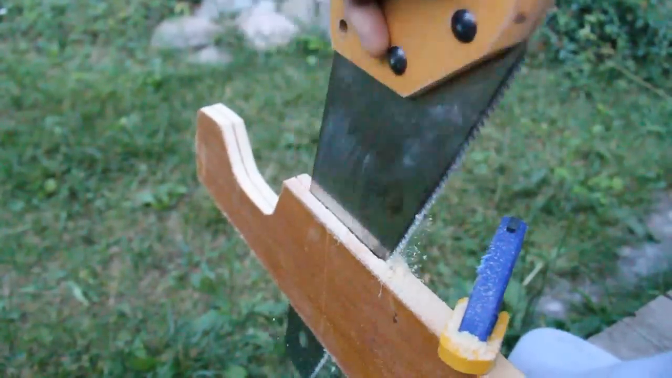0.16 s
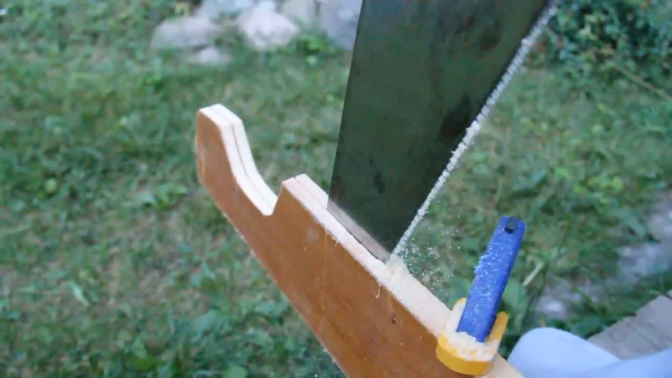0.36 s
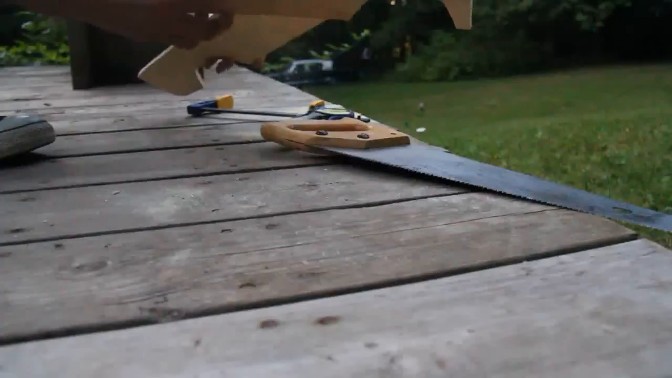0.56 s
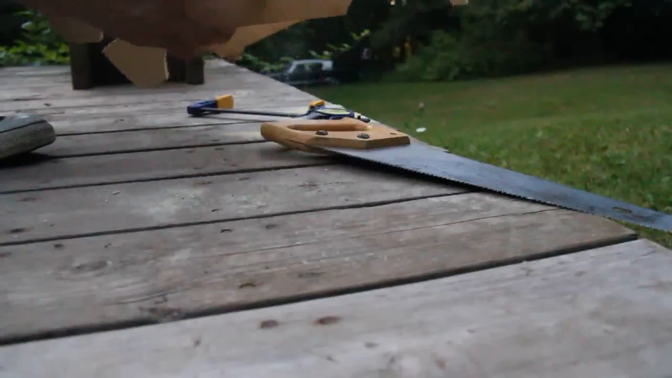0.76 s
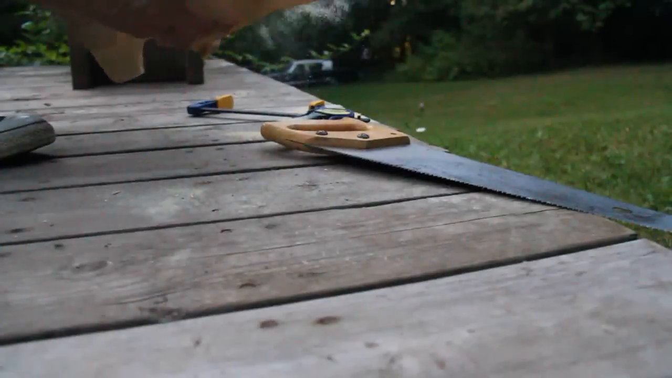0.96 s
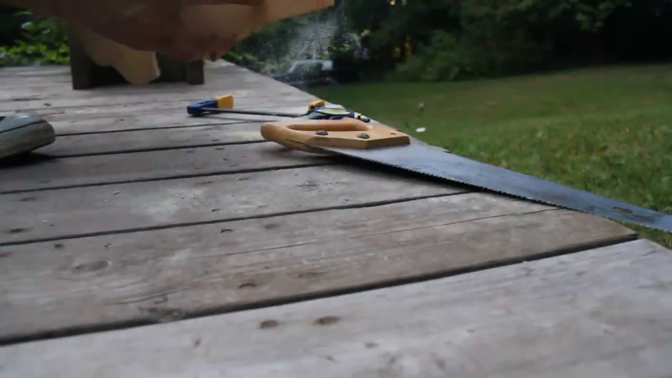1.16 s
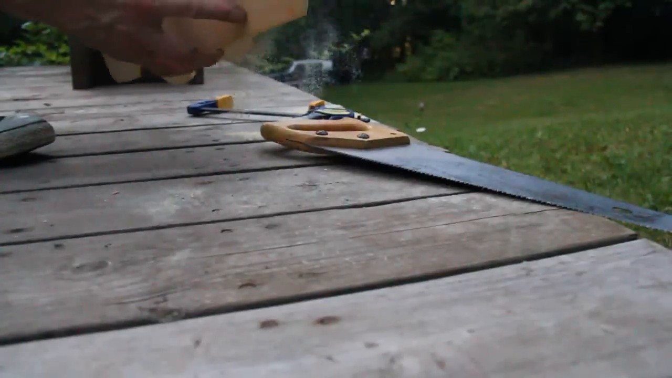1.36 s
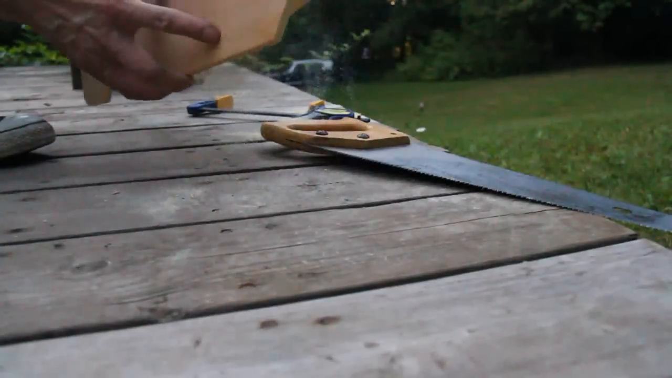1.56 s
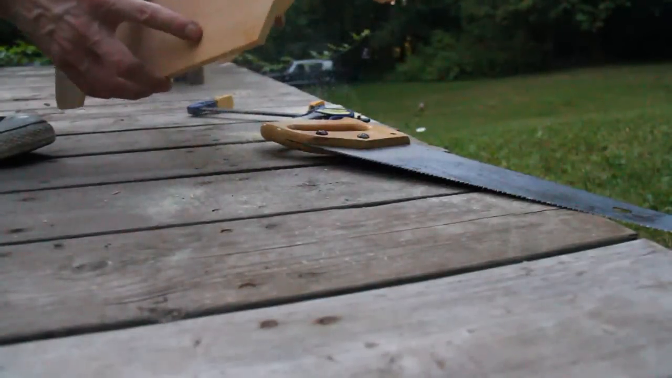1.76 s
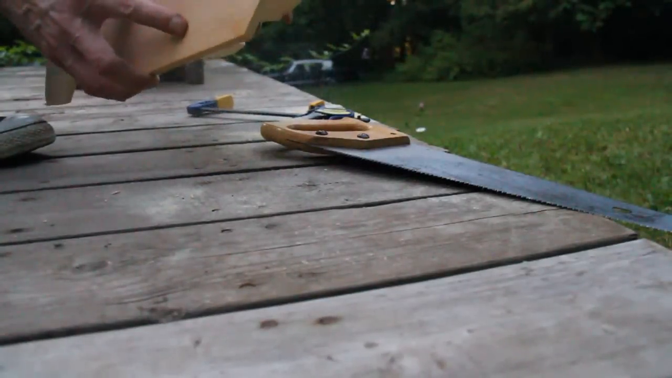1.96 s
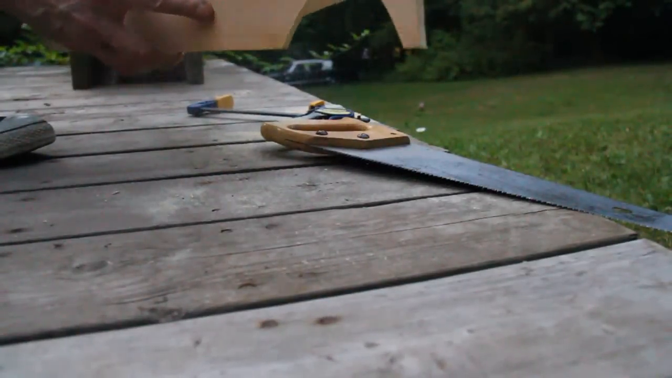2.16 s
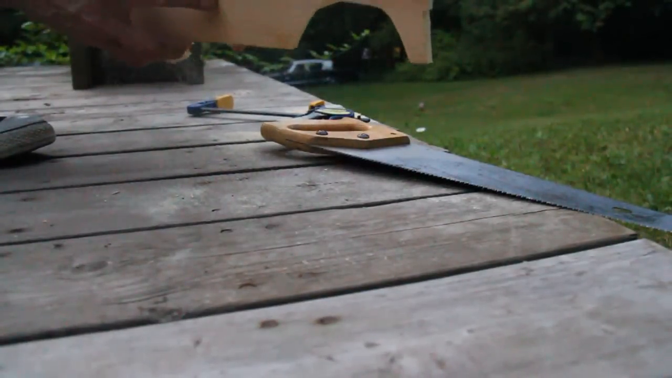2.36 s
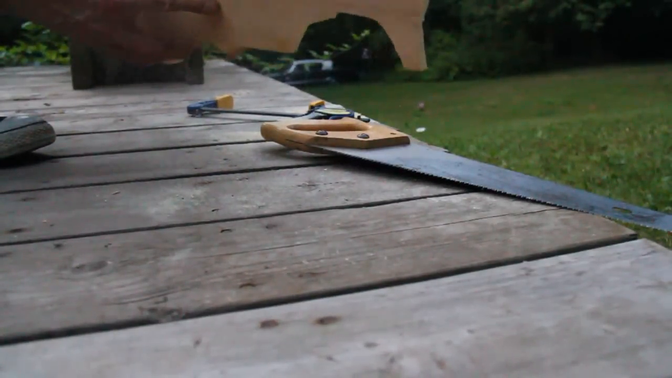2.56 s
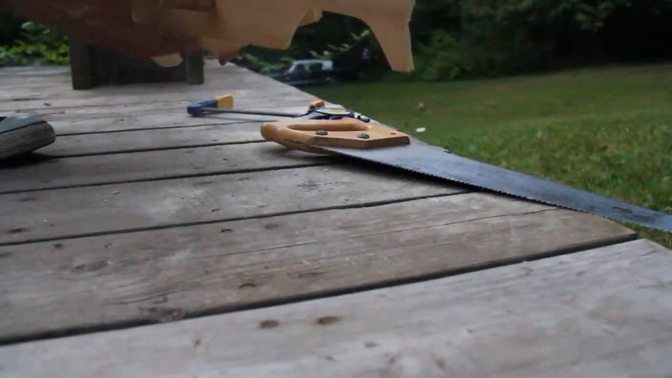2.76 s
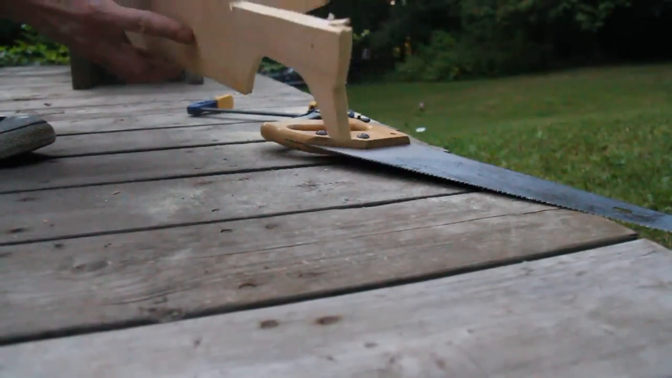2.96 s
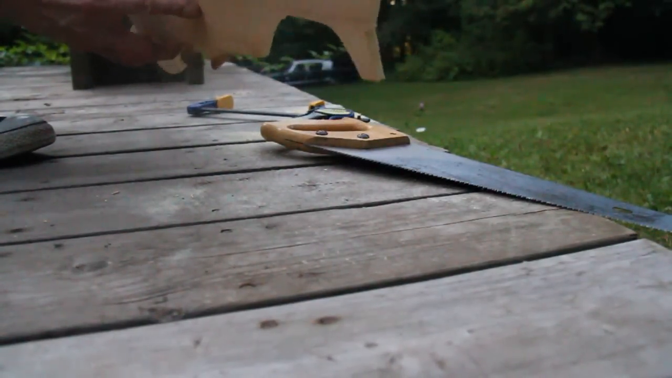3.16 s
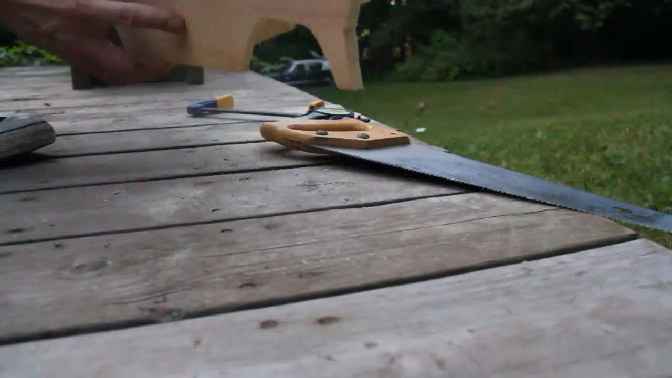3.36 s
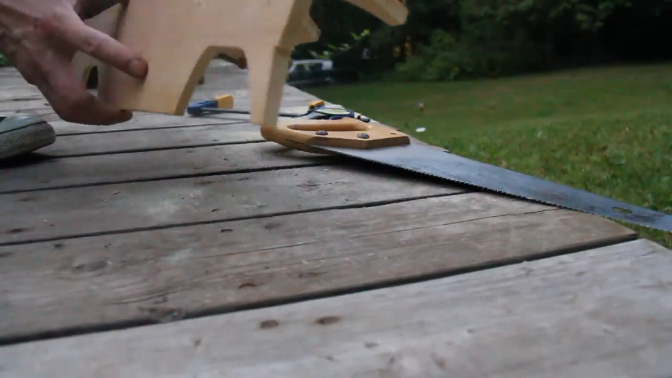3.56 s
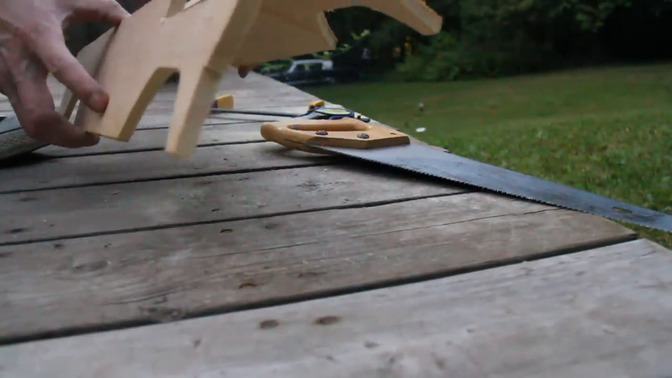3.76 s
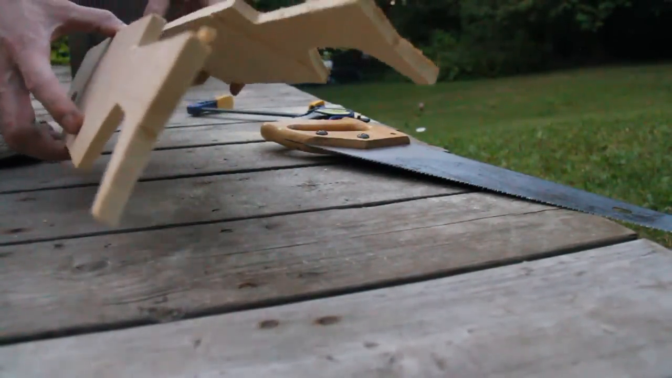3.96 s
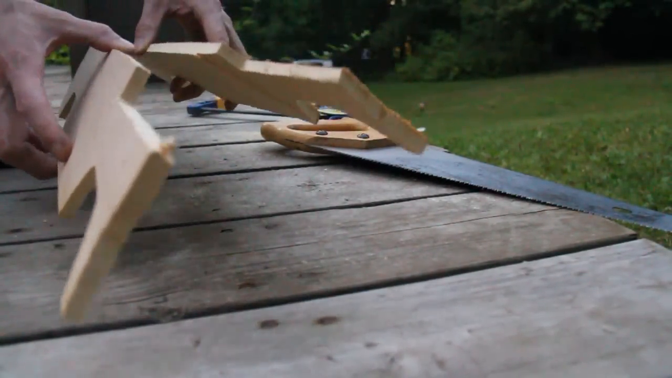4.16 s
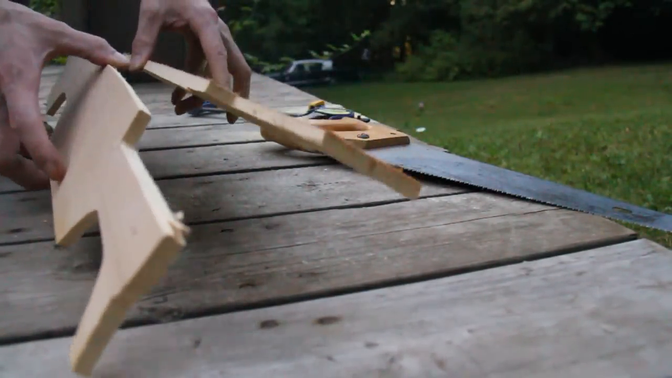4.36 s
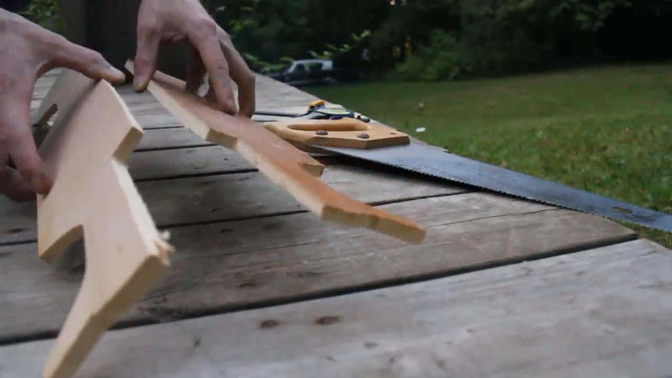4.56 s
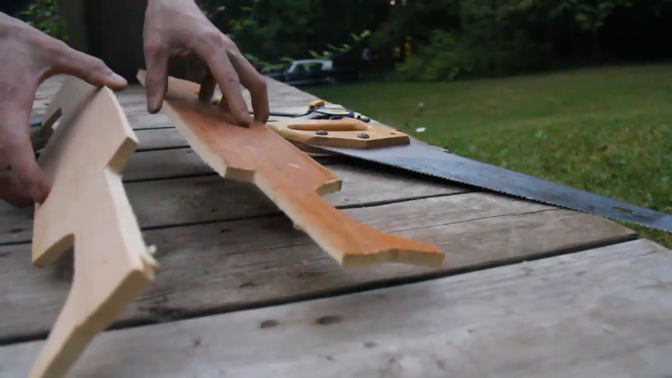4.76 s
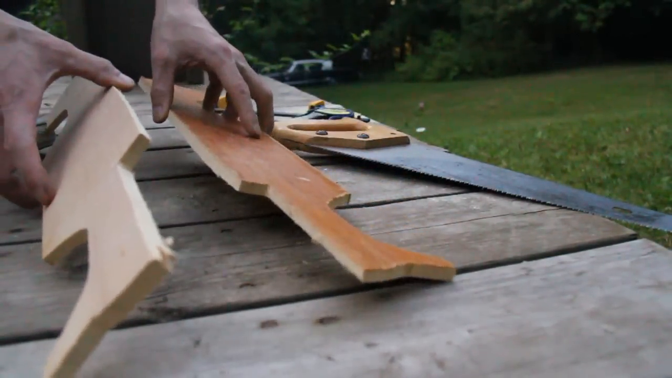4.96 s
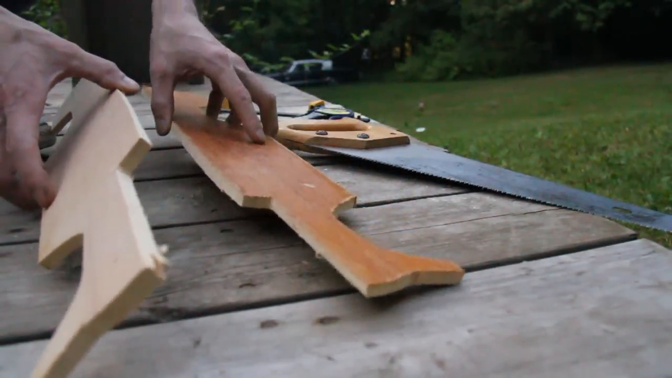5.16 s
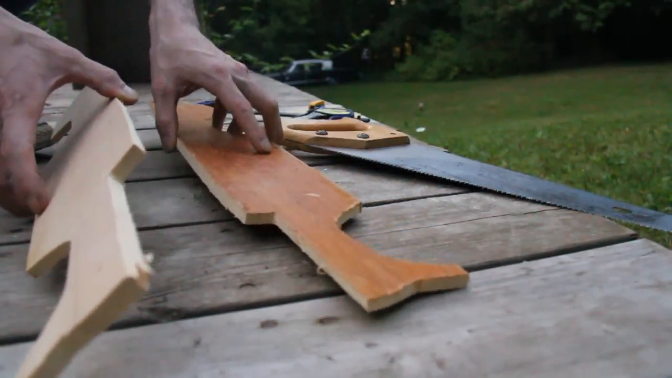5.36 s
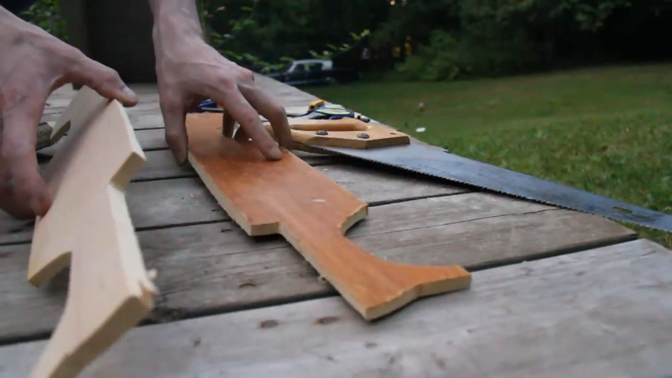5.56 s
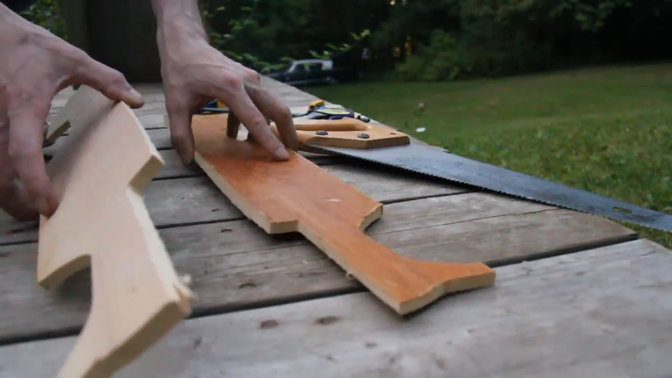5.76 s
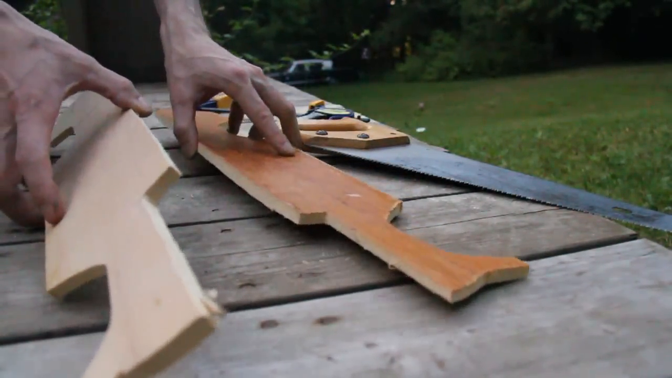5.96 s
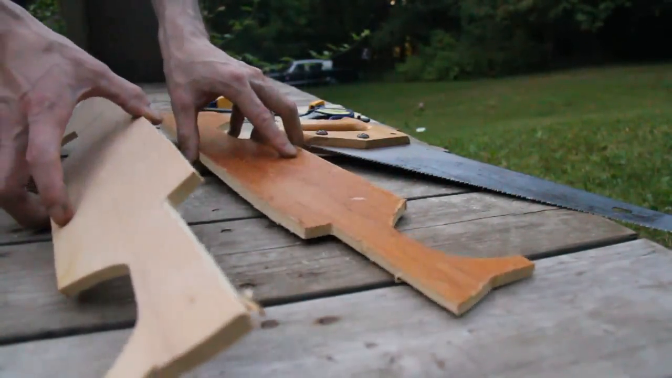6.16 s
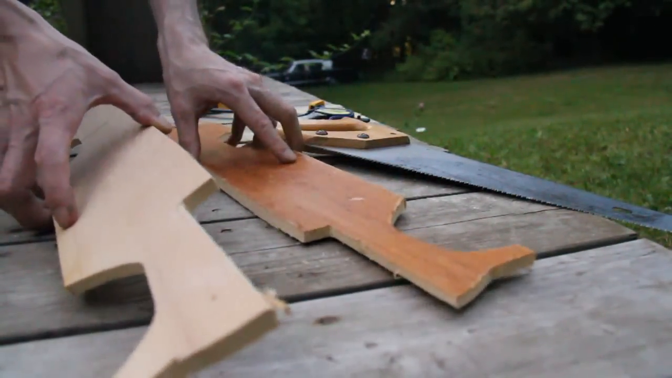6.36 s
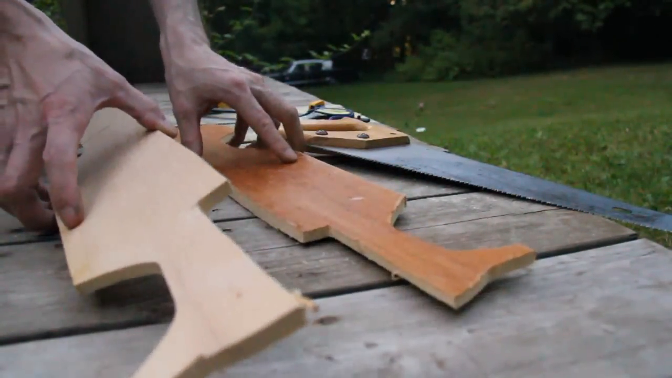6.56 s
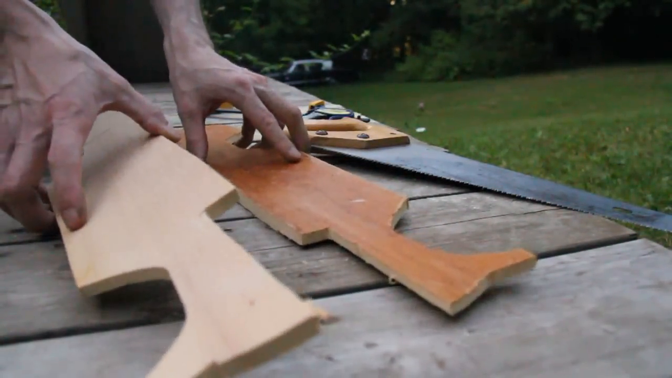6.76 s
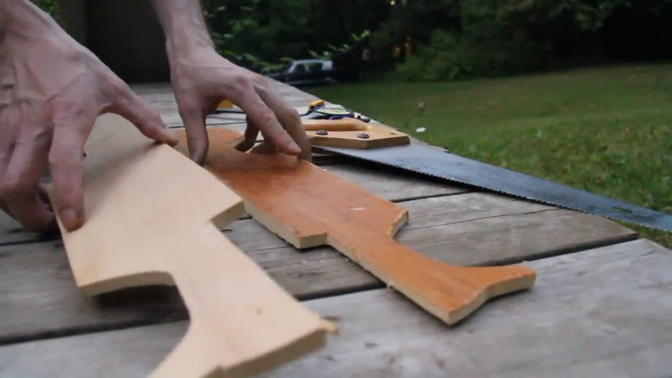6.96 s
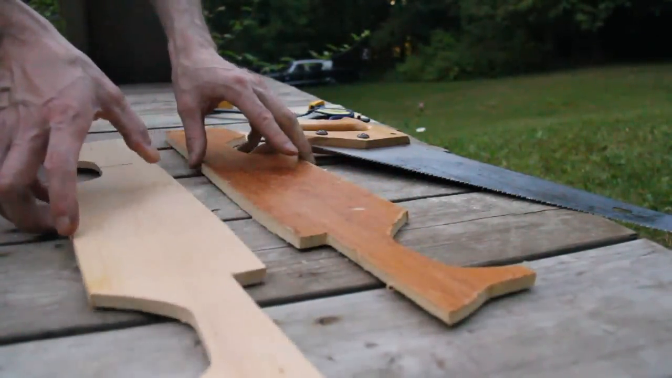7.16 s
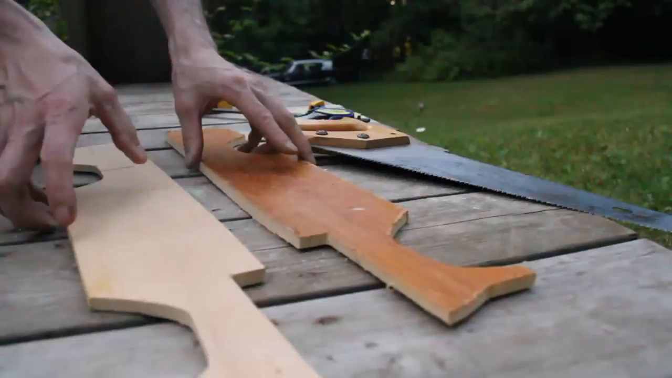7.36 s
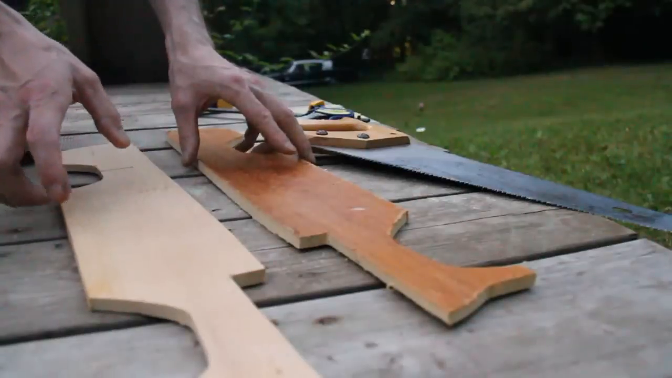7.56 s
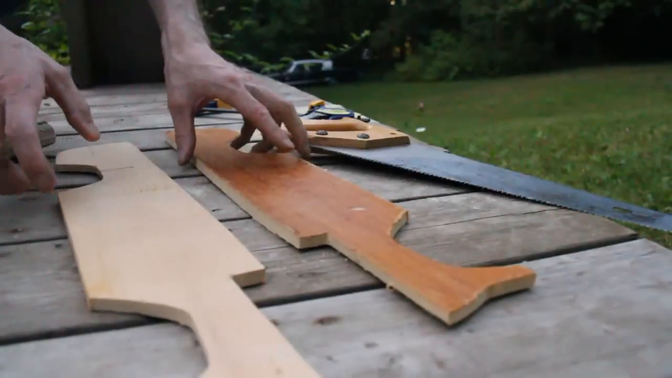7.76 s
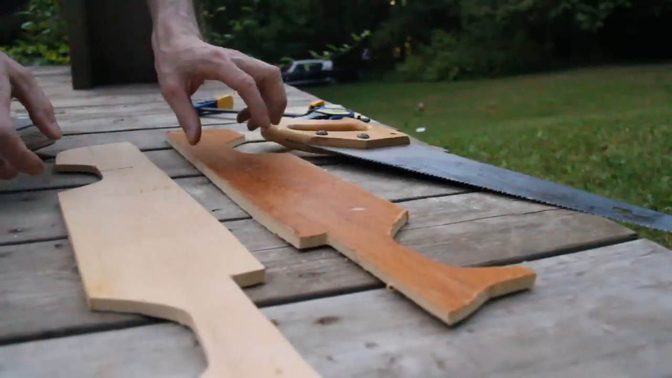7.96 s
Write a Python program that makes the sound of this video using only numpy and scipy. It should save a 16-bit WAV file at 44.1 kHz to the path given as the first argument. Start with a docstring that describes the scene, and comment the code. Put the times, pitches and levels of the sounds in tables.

```python
"""In a quiet garden, a handsaw takes its last strokes through a clamped board.
Then two cut boards are clapped together, rubbed by hands, slid over a wooden deck and laid down with knocks.
The saw is dense random bites, coloured and swelling with blade speed, plus a humming blade.
Rubs keep the ringing tones (modes) of the wood going with friction clicks; knocks set them off with short bursts.
The garden is coloured noise, and the yard sends back a dull wash of the knocks."""
import sys
import numpy as np
from scipy import signal
from scipy.fft import rfft, irfft, next_fast_len
from scipy.io import wavfile

SR = 44100
rng = np.random.default_rng(int(sys.argv[2]) if len(sys.argv) > 2 else 0)


def wav_record(signal):
    """Record a signal, one row per channel, as 16-bit PCM in the file named by sys.argv[1]."""
    frames = np.transpose(np.atleast_2d(signal))
    bounded = np.clip(frames, -1, 1)
    # unit amplitude maps onto the largest positive 16-bit level
    quanta = np.round(bounded * 32767).astype(np.int16)
    wavfile.write(sys.argv[1], SR, quanta)


N = 353241   # length in samples, about 8 s


def from_db(db):
    """Turn a level in dB into a gain."""
    return np.exp(np.asarray(db) * (np.log(10) / 20))


def rms_one(x):
    """Scale a signal to an rms (average strength) of 1."""
    return x / np.sqrt(np.mean(x ** 2) + 1e-20)


def in_time(rows):
    """Draw each level column as a gain over time, silent outside its first and last point."""
    s, *columns = np.transpose(rows)
    t = np.arange(N) / SR
    return [from_db(np.interp(t, s, column, left=-200, right=-200)) for column in columns]


def drift(rate_hz, size=N):
    """Wander slowly by chance with rms 1: smoothed noise drawn at every 20th sample."""
    step, settle = 20, 2000
    r = np.exp(-2 * np.pi * rate_hz * step / SR)
    noise = rng.standard_normal(size // step + settle + 2)
    slow = signal.lfilter([1], [1, -2 * r, r * r], noise)[settle:]   # skip the filter's start-up
    return np.interp(np.arange(size) / step, np.arange(len(slow)), rms_one(slow))


def grains(per_s, spread_db):
    """Scatter random clicks of uneven size and sign, like many tiny contacts."""
    size_db = spread_db * np.minimum(rng.exponential(1, N), 4)
    sizes = from_db(size_db) * rng.choice([-1, 1], N)
    return sizes * (rng.random(N) < per_s / SR)


def coloured(x, spectrum):
    """Shape the pitch balance of noise or clicks by a spectrum, then scale to rms 1."""
    hz, db = np.transpose(spectrum)
    size = next_fast_len(N)
    bins_hz = np.fft.rfftfreq(size, 1 / SR)
    gain = from_db(np.interp(np.log(bins_hz + 1), np.log(hz), db, left=-90, right=-90))
    return rms_one(irfft(rfft(x, size) * gain, size)[:N])


# background level, with brief dips: (t/s, level/dB)
GARDEN_LEVEL = [(0, -46), (1.1, -58), (1.6, -55.5), (2.7, -54), (2.8, -84), (3.2, -54.5), (3.3, -70),
                (3.9, -59), (4.6, -55), (7.2, -60.5), (7.6, -63.5), (8.01, -55)]
# colour of the background: (f/Hz, relative level/dB per Hz)
GARDEN_COLOUR = [(15, -37), (25, -3), (54, 1), (155, -14.5), (188, -13), (557, -18.5), (661, -9.5),
                 (934, -21.5), (2000, -22), (3800, -26), (9000, -42), (11700, -67), (19800, -120)]


def garden():
    """Quiet outdoor air: coloured noise whose level follows a curve."""
    level, = in_time(GARDEN_LEVEL)
    return level * coloured(rng.standard_normal(N), GARDEN_COLOUR)


YARD_T60_S, YARD_DB, YARD_HZ = 0.28, -32.5, 1050   # time to die by 60 dB, level, pitch region


def yard(x):
    """Walls and trees scatter a dull, dying wash back: the sound is smeared by fading noise."""
    t = np.arange(SR) / SR
    fade_in = np.minimum(t / 0.005, 1)
    tail = rng.standard_normal(SR) * from_db(-60 * t / YARD_T60_S) * fade_in
    dull = signal.butter(3, [.5 * YARD_HZ, 1.3 * YARD_HZ], "band", fs=SR, output="sos")
    tail = signal.sosfilt(dull, tail)
    return from_db(YARD_DB) * signal.fftconvolve(x, tail / np.sqrt(np.sum(tail ** 2)))[:N]


# bending tone of the blade, two runs: (t/s, f/Hz, level/dB before a 3 dB lift)
BLADE_FLEX = [
    [(0.17, 74, -43), (0.188, 71.3, -31), (0.238, 79.5, -20), (0.306, 89.2, -30), (0.382, 109, -30),
     (0.422, 114.4, -29), (0.56, 110.1, -40)],
    [(0.67, 126.5, -63), (0.676, 126, -48), (0.706, 128.3, -19.5), (0.736, 125.7, -48.5),
     (0.84, 131.5, -34), (0.93, 126.8, -39)],
]


def blade():
    """The flexing blade hums with a tone that follows its free length; returns the hum and its swing."""
    s, hz, db = np.vstack(BLADE_FLEX).T
    t = np.arange(N) / SR
    pitch_hz = np.interp(t, s, hz)
    swing = np.sin(2 * np.pi * np.cumsum(pitch_hz) / SR)
    level_db = np.interp(t, [0, *s, s[-1] + 0.074], [-45, *db, -90])
    return from_db(level_db + 3) * swing, swing


# saw strokes: (start t/s, length t/s, then before speed and flicker: shudder level/dB, rasp level/dB,
#               tearing level/dB; rasp change over the stroke level/dB, tearing change level/dB)
STROKES = [(-.35, 0.45, -17, -17.5, -21, 1.5, -8.5), (0.11, 0.54, -27, -17.5, -22.5, -7.5, -13.5),
           (0.61, 0.41, -31, -25, -23, -20.5, 2)]
# how steeply shudder, rasp and tearing follow blade speed: (power of the speed)
SPEED_POWER = [0.83, 2.1, 1.785]
SHUDDER_LEAN_DB = -19     # change of the shudder along a stroke
SHUDDER_REST_DB = -40     # steady shudder that lingers at the turns, before flicker and a 3 dB cut
CUT_THROUGH_S = 1.04      # the steady shudder stops here


def strokes():
    """Blade speed is a half sine per stroke; gains of shudder, rasp and tearing grow with it."""
    t, gains = np.arange(N) / SR, np.zeros((3, N))
    gains[0] = from_db(SHUDDER_REST_DB) * (t < CUT_THROUGH_S)
    for s, length, shudder_db, rasp_db, tearing_db, rasp_lean_db, tearing_lean_db in STROKES:
        along = np.clip((t - s) / length, 0, 1)   # 0 at the start of the stroke, 1 at its end
        speed = np.abs(np.sin(np.pi * along))
        lean_db = np.outer([SHUDDER_LEAN_DB, rasp_lean_db, tearing_lean_db], along - .5)
        levels_db = np.c_[[shudder_db, rasp_db, tearing_db]]
        gains += from_db(lean_db + levels_db) * speed ** np.c_[SPEED_POWER]
    return gains


# colours of the low shudder, the middle rasp and the high tearing: (f/Hz, relative level/dB per Hz)
SHUDDER_COLOUR = [(15, -45.5), (25, -9.5), (113, 2.5), (156, -1.5), (204, 4.5), (254, -10.5), (360, -6),
                  (400, -16.5), (520, -36.5), (880, -120)]
RASP_COLOUR = [(150, -35.5), (250, -11), (297, -4), (328, -23.5), (366, -2), (404, -5), (521, -1.5),
               (685, -6), (937, -14), (1320, -11.5), (1490, -20.5), (1800, -21), (2340, -22), (3960, -120)]
TEARING_COLOUR = [(880, -5), (1500, -6.5), (1830, -0.5), (2110, -7), (2450, -4.5), (3180, -8),
                  (4180, -10.5), (4550, -11.5), (6040, -15.5), (8860, -25.5), (11000, -40.5),
                  (14300, -75.5), (22000, -120)]


def saw():
    """Teeth bite in a dense uneven stream; blade swing strengthens rasp and tearing, catching adds flicker."""
    shudder, rasp, tearing = strokes()
    hum, swing = blade()
    catch = drift(17)
    shudder_flicker = from_db(1.6 * drift(30) - 3)
    rasp_flicker = from_db(.7 * catch + 1.1 * swing)
    tearing_flicker = from_db(1.4 * catch + 0.5 * swing)
    out = hum + shudder * shudder_flicker * coloured(grains(900, 4.8), SHUDDER_COLOUR)
    out += rasp * rasp_flicker * coloured(grains(3000, 2.8), RASP_COLOUR)
    return out + tearing * tearing_flicker * coloured(grains(7000, 2.2), TEARING_COLOUR)


RUB_EDGE_DB = -24.5   # how far below its full level a rub starts and ends


def swell(t, rise_s, hold_s, fall_s, start_s):
    """Level of one rub in dB: rise, hold and fall, silent outside."""
    lengths = [0, max(rise_s, .003), max(hold_s, .001), max(fall_s, .003)]
    corners = start_s + np.cumsum(lengths)
    return np.interp(t, corners, [RUB_EDGE_DB, 0, 0, RUB_EDGE_DB], left=-200, right=-200)


# rubs, slides and the jostling of the boards after a knock: (start t/s, rise t/s, hold t/s, fall t/s,
#   then before flicker: low board modes level/dB, high board modes level/dB, skin and dust hiss level/dB)
RUBS = [(0.949, .02, 0.034, 0.084, -41, -44, -48.5), (1.058, 0.063, .3, 0.11, -53, -60, -60.5),
        (1.187, .13, 0.013, 0.16, -45, -50.5, -59), (1.452, 0.077, 0.38, 0.056, -62, -68.5, -66.5),
        (1.697, 0.042, 0.15, 0.072, -60, -62.5, -72), (1.975, 0.03, 0.041, 0.051, -38.5, -45, -46.5),
        (2.107, 0.067, .12, 0.031, -42, -47.5, -47.5), (2.283, .02, 0.043, .05, -49, -48, -47),
        (2.365, 0.041, 0.075, 0.091, -45, -51.5, -56.5), (2.496, 0.11, .09, .02, -52.5, -59, -66),
        (2.688, .02, 0.038, 0.078, -50.5, -49.5, -60.5), (2.785, 0.066, 0.35, 0.034, -54.5, -71, -88),
        (3.035, 0.096, 0.0046, 0.027, -47, -54, -60), (3.199, .02, 0.046, 0.063, -45.5, -47.5, -58.5),
        (3.28, 0.055, 0.28, .4, -56, -64, -83), (3.5, .2, .95, .05, -66, -69.5, -66),
        (4.662, 0.024, .06, .04, -54, -63, -70.5), (4.748, 0.017, 0.056, 0.17, -46, -56, -57.5),
        (4.972, 0.054, 0.25, 0.062, -52.5, -60.5, -64.5), (5.163, .11, 0.047, 0.16, -46, -54, -59.5),
        (5.32, .08, 0.094, 0.16, -46.5, -53, -53), (5.52, 0.069, 0.13, 0.034, -54.5, -55, -61.5),
        (5.669, 0.075, 0.093, 0.037, -45.5, -48.5, -55.5), (5.774, 0.074, 0.31, 0.077, -41.5, -44.5, -50),
        (6.177, 0.067, 0.59, 0.22, -51.5, -59.5, -61.5), (6.295, 0.091, 0.045, 0.2, -53.5, -55, -62.5),
        (6.815, 0.1, .1, .05, -43.5, -52, -56.5), (6.955, 0.12, 0.072, 0.044, -36, -43.5, -47),
        (7.14, 0.054, 0.079, 0.027, -44, -50, -51), (7.25, .02, 0.026, 0.1, -46.5, -48.5, -59),
        (7.365, .04, 0.067, 0.074, -51, -65, -77.5), (7.493, 0.055, 0.044, 0.18, -54, -74.5, -81.5),
        (7.66, 0.08, 0.12, .2, -59, -67, -68)]


def rubs():
    """Gains of low modes, high modes and hiss, summed over the rubs every millisecond."""
    t = np.arange(0, N / SR, .001)
    gains = np.zeros((3, len(t)))
    for s, rise, hold, fall, *levels_db in RUBS:
        gains += from_db(swell(t, rise, hold, fall, s) + np.c_[levels_db])
    return [np.interp(np.arange(N) / SR, t, gain) for gain in gains]


HIGH_MODES_HZ = 1950   # modes above this count as high


def rubbed(modes, span, length):
    """Friction grains keep the modes ringing; the grip moves, so modes take turns. Low and high apart."""
    friction = grains(3000, 1.9) + 1e-18
    out = np.zeros((2, len(friction[span])))
    for hz, db, t60 in modes:
        r, w = from_db(-60 / (length * t60 * SR)), 2 * np.pi * hz / SR
        push = np.roll(friction, round(hz))[span]   # shifted, so the modes are not pushed all at once
        ring = signal.lfilter([1, 0, -1], [1, -2 * r * np.cos(w), r * r], push)
        turn_db = 2.5 * drift(5.8, size=len(ring))
        out[int(hz > HIGH_MODES_HZ)] += from_db(db + turn_db) * rms_one(ring)
    return [rms_one(out[0]), rms_one(out[1])]


# ringing tones of a board, and broad ones of a board dragged with its edge on the deck:
# (f/Hz, relative level/dB, time to die by 60 dB before the players scale it t/s)
BOARD_MODES = [(622, -14.5, 0.29), (799.7, 2, 0.053), (885.6, 1, 0.05), (1052.5, 5.5, 0.049),
               (1199, 5, 0.041), (1351, 6.5, 0.038), (1478, -3.5, 0.099), (1684, 1, 0.04), (1863, 6, 0.03),
               (2166, -8, 0.057), (2375, -10.5, .045), (2674, -8.5, .04), (3012, -12, 0.063),
               (3280, -26, 0.09), (3943, -36, .03), (4860, -47, 0.041)]
DRAGGED_MODES = [(515, -4.5, 0.12), (735.3, 1.5, 0.051), (792.5, -3, 0.1), (1054.6, 3.5, 0.032),
                 (1187, -0.5, 0.16), (1336, 4, 0.023), (1538, 0, 0.04), (1765, -1.5, 0.026),
                 (2114, 5, 0.013), (2310, 0, 0.056), (2450, 2.5, 0.028), (2714, 0, 0.022),
                 (3340, -18.5, .04), (3930, -6, 0.043), (4500, -18, .05)]
# colour of the skin and dust hiss: (f/Hz, relative level/dB per Hz)
HISS_COLOUR = [(1880, -17.5), (3200, 4), (3890, 0), (4240, -1.5), (5640, -3.5), (8810, -22), (9300, -32),
               (11200, -60.5), (20500, -120)]
# level of the rumble in the deck, before flicker and dragging: (t/s, level/dB)
RUMBLE_LEVEL = [(1.04, -51), (1.41, -56.5), (2.09, -51.5), (2.5, -53), (2.63, -52.5), (2.8, -59),
                (3.54, -70), (3.99, -70.5), (4.73, -56.5), (4.9, -52), (5.02, -59.5), (6.92, -56),
                (7.31, -55.5), (7.41, -39), (7.47, -37.5), (7.62, -40), (7.72, -60.5), (8.01, -64)]
# colour of that rumble: (f/Hz, relative level/dB per Hz)
RUMBLE_COLOUR = [(15, -30), (25, 17.5), (70, 4.5), (134, 2.5), (327, -6.5), (458, 0), (500, -18), (650, 0),
                 (1100, -120)]
SET_DOWN_S = 4.66         # from here on the boards lie on the deck
RUMBLE_SHARE_DB = -5.5    # what a dragged board adds to the rumble, against its low modes


def handling():
    """Rubbing rings the boards, hisses on the surface and rumbles in the deck."""
    rumble, = in_time(RUMBLE_LEVEL)
    low, high, hiss = rubs()
    stick = from_db(1.4 * drift(29))
    down = round(SET_DOWN_S * SR)
    held = rubbed(BOARD_MODES, slice(0, down), length=1.0)
    dragged = rubbed(DRAGGED_MODES, slice(down, N), length=1.77)
    low_ring, high_ring = np.hstack([held, dragged])
    out = stick * (low * low_ring + high * high_ring + hiss * coloured(grains(8000, 2.4), HISS_COLOUR))
    rumble[down:] += from_db(RUMBLE_SHARE_DB) * low[down:]
    return out + rumble * from_db(1.1 * drift(12)) * coloured(rng.standard_normal(N), RUMBLE_COLOUR)


def struck(modes, centre_hz, narrow_db, chatter_ms, length, size):
    """A blow and its chatter drive the modes near a centre, each with a strength of its own; peak 1."""
    t = np.arange(size) / SR
    hz, db, t60 = np.transpose(modes)[:, :, None]
    octaves_off = np.log2(hz / centre_hz)
    strength = from_db(db - max(narrow_db, 0) * octaves_off ** 2 + rng.normal(0, 2.7, hz.shape))
    decay = from_db(-60 * t / (t60 * length))
    rings = np.sum(strength * decay * np.sin(2 * np.pi * hz * t), axis=0)
    push = rng.standard_normal(2000) * np.exp(-t[:2000] * 1000 / chatter_ms)
    push[0] = 28 / chatter_ms   # the first touch stands out less in a long chatter
    soft = signal.butter(3, [.3 * centre_hz, 2.02 * centre_hz], "band", fs=SR, output="sos")
    fade_out = np.cos(np.linspace(0, np.pi / 2, size))
    out = signal.sosfilt(soft, signal.fftconvolve(rings, push)[:size]) * fade_out
    return out / np.max(np.abs(out))


# knocks: (t/s, board peak level/dB, brightest ring f/Hz, fall-off around it level/dB per octave squared
#   (below 0 counts as 0), chatter dying time of the board/ms, deck thud peak level/dB, thud centre f/Hz,
#   boom peak level/dB, crack peak level/dB)
KNOCKS = [(0.941, 8, 924, 31, 5.57, -7, 514, -47.5, -16), (0.997, -8, 1450, 12, 10, -43, 423, -50, -39),
          (2.303, 4.5, 970, 11, 7, -9.5, 430, -27.5, -16.5),
          (2.338, -10.5, 1530, 6, 3.5, -29.5, 385, -45, -46),
          (2.706, 14, 1720, 13.5, 3.7, -17, 598, -45.5, -1),
          (2.713, 2, 1010, 5, 3.2, -21, 525, -46.5, -32.5),
          (2.764, -11.5, 1160, 36, 6.1, -32, 420, -57, -60),
          (3.205, 10.5, 2010, 23.5, 3.86, -30.5, 374, -48, -15),
          (3.263, -12.5, 1590, 14, 4.7, -36, 423, -61, -48.5),
          (4.672, -34.5, 616.5, 9, 2.7, -30, 205, -30, -61.5),
          (4.773, -29, 1100, 6, 13, -36, 154, -28.5, -48), (4.968, -4, 1230, 38, 7.8, -20.5, 474, -37, -35),
          (5.064, -28.5, 1410, -11, 13, -37, 468, -46, -43.5),
          (5.113, -41, 2350, 13, 4.9, -57, 417, -52, -47), (5.185, -36, 713, 9, 5.4, -44.5, 153, -32, -51),
          (5.402, -31, 1040, 11, 7, -46, 149, -37, -55), (5.611, -36, 790, -3, 7.4, -38.5, 382, -37.5, -56),
          (5.794, -27.5, 1040, 20, 3.8, -63, 540, -44, -68), (6.422, -19, 650, 40, 9, -23.5, 203, -32, -52),
          (6.995, -20.5, 690, 38, 5.5, -22, 241, -38.5, -53.5),
          (7.252, 9.5, 904, 5, 5.9, -34, 401, -58, -14.5),
          (7.264, 5, 1030, 5.5, 3.34, -18, 428, -30.5, -23),
          (7.277, -8, 924, 10.5, 6.1, -36.5, 584, -54, -41),
          (7.322, -16, 770, 3, 7, -21.5, 371, -34.5, -59), (7.349, -39, 780, 30, 9.9, -27, 375, -43, -72),
          (7.377, -32, 780, 20, 9, -24, 375, -42, -59),
          (7.411, -2.5, 1100, 46.5, 1.8, -28, 404, -47.5, -28.5),
          (7.427, -12.5, 690, 0, 8.7, -27.5, 581, -44, -61), (7.488, -9, 785, 21, 7.6, -23, 393, -46, -63),
          (7.541, -18, 773, 28, 7.3, -27, 260, -59, -68), (7.554, -25, 840, 31, 8.8, -34, 394, -43, -72.5)]
# ringing tones of the deck, and a low boom (of the held boards before set-down, of the deck after): # (f/Hz,
# relative level/dB, time to die by 60 dB before the knock scales it t/s)
DECK_MODES = [(166, -17, 0.25), (201, -1, 0.22), (287, -2, 0.2), (377.7, 1, 0.41), (430, -6, 0.14),
              (456.4, 5.5, 0.22), (520, -4.5, 0.078)]
LOW_BOOM = [(74, 0, .3), (112, 0, 1.1)]
THUD_SHARE = 0.65                      # share of the deck modes' dying time
RING_SHARE, RING_PER_DB = 0.51, 0.01   # share of the board modes' dying time at 0 dB, and change per dB
BOOM_HELD_HZ, BOOM_LAID_HZ = 115, 76.7   # boom centre before and after the boards are set down


def knocks():
    """Each knock rings the board around its brightest mode, thuds in the deck, booms low and cracks briefly."""
    out, short, long = np.zeros(N + SR), SR // 10, SR // 3
    short_ms = np.arange(short) / SR * 1000
    sharp = signal.butter(2, [2800, 7000], "band", fs=SR, output="sos")
    for s, board_db, bright_hz, narrow_db, chatter_ms, thud_db, thud_hz, boom_db, crack_db in KNOCKS:
        length = RING_SHARE + RING_PER_DB * board_db   # louder knocks ring longer
        boom_hz = BOOM_HELD_HZ if s < SET_DOWN_S else BOOM_LAID_HZ
        ring = struck(BOARD_MODES, bright_hz, narrow_db, chatter_ms, length, size=short)
        thud = struck(DECK_MODES, thud_hz, narrow_db=6, chatter_ms=0.52 * chatter_ms,
                      length=THUD_SHARE, size=long)
        boom = struck(LOW_BOOM, boom_hz, narrow_db=32.0, chatter_ms=.3, length=0.7, size=long)
        burst = rng.standard_normal(short) * np.exp(-short_ms / (0.62 * chatter_ms))
        crack = signal.sosfilt(sharp, burst)
        crack /= np.max(np.abs(crack))
        at = round(s * SR)
        out[at:at + short] += from_db(board_db) * ring + from_db(crack_db) * crack
        out[at:at + long] += from_db(thud_db) * thud + from_db(boom_db) * boom
    return out[:N]


def scene():
    """Add all sources; both channels carry the same sound, and only the knocks get the yard's wash."""
    blows = knocks()
    mono = garden() + yard(blows) + saw() + handling() + blows
    return np.array([mono, mono])


def record(dry):
    """Peaks overload softly, the deepest bass is thinned, the top is cut."""
    top, cutoff_hz = .68, 15300   # the overload never passes top
    clipped = dry / (1 + np.abs(dry / top) ** 4) ** .25
    thinned = signal.sosfilt(signal.butter(2, 50, "high", fs=SR, output="sos"), clipped)
    return signal.sosfilt(signal.cheby2(12, 70, cutoff_hz, fs=SR, output="sos"), thinned)


dry = scene()
out = record(dry)
wav_record(out)
```